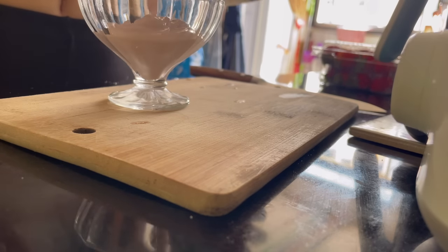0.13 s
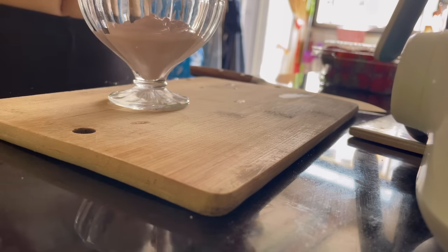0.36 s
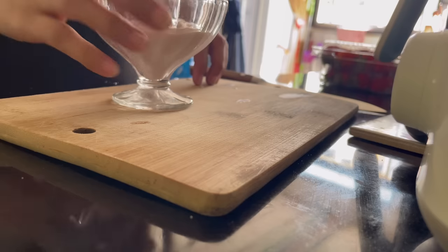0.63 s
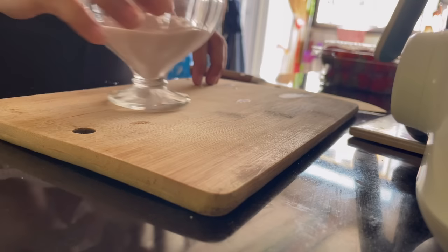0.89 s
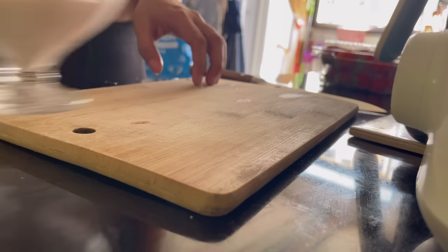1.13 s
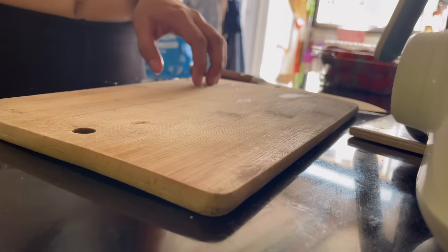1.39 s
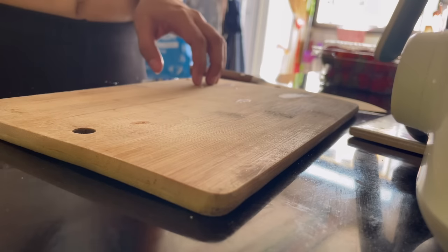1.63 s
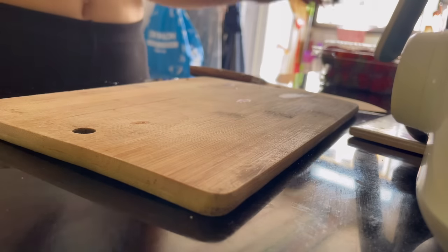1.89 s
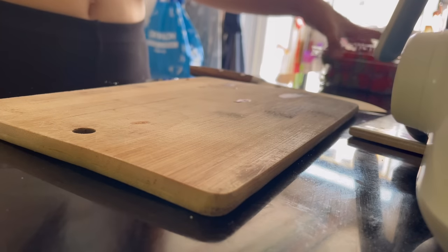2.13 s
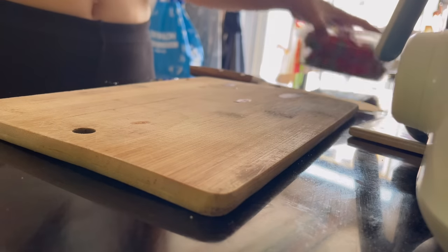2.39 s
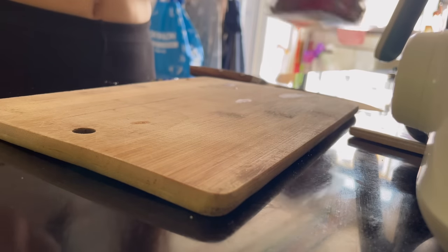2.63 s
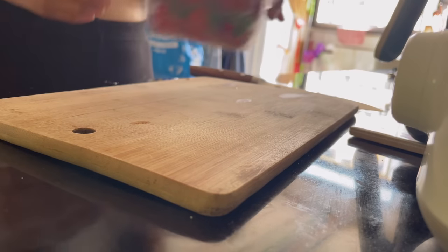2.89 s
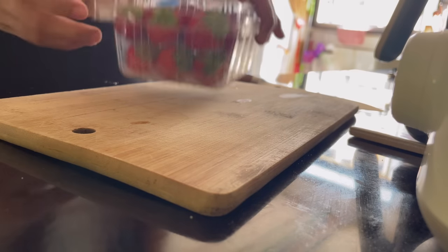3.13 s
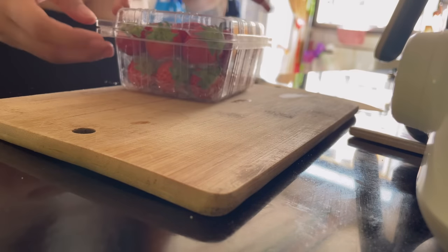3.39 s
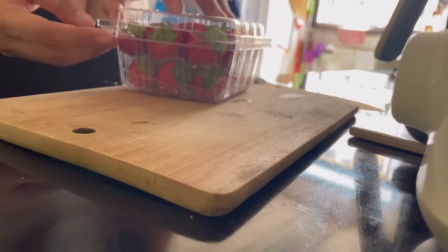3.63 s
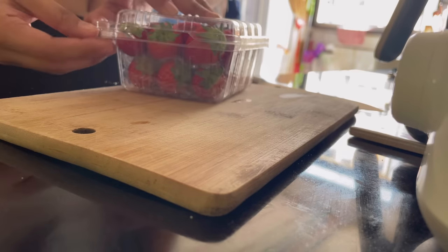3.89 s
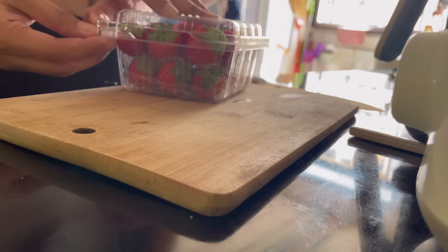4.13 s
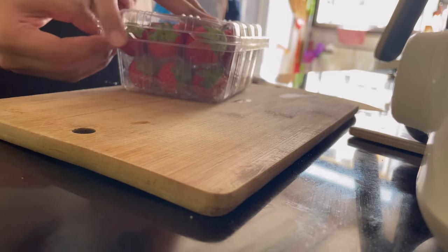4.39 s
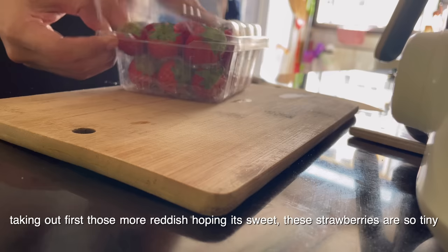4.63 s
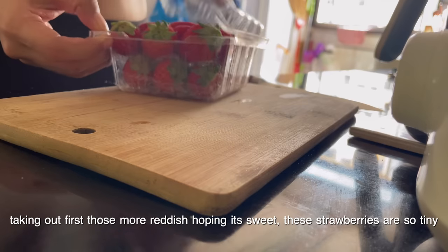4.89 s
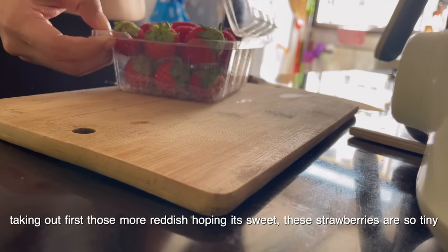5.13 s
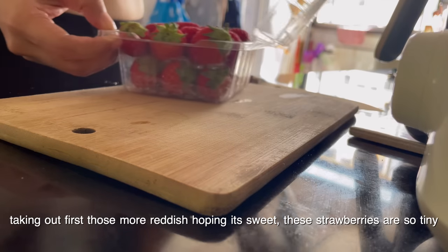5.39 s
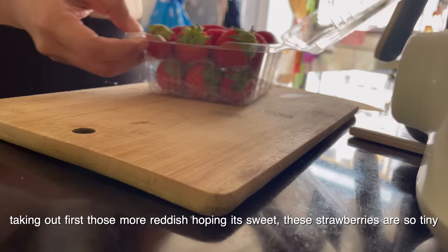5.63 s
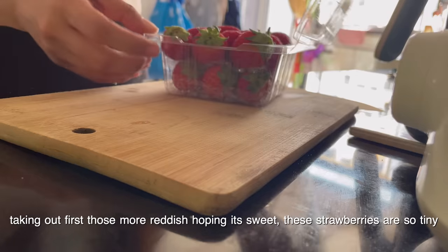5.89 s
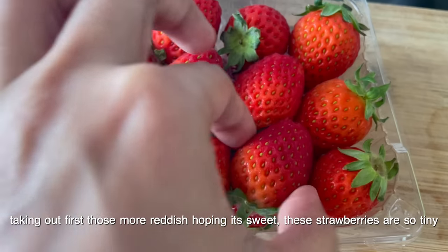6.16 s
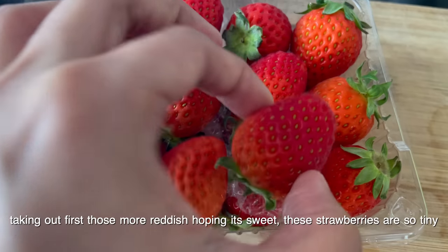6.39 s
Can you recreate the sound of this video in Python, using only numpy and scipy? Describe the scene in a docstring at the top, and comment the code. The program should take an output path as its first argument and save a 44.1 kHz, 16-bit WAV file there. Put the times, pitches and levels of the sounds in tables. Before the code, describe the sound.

A low, soft kitchen hum runs throughout, with very faint high whines and a thin whistle fading after 0.8 s. Tiny distant birds chirp between about 0.9 and 1.7 s. At 1.4 s a glass bowl hits the table: a loud, hard clunk with a short woody ring and bright glass edge, chattering quickly until 1.5 s, with barely audible touches after. A faint soft tone comes at 1.75 s. Light plastic ticks crackle at 2.1-2.25 s, then clicks at 2.8-3.3 s as a thin fruit box lands on wood. Small creaks continue to 4.2 s. A firm click at 4.3 s leads to very loud snaps at 4.6 and 4.83 s and another at 5.2 s. The box slides with a quiet hiss around 5.3-5.8 s, with small clicks and soft low bumps. From 6.0 s one plastic click, then fingertips tick and brush faintly; a last chirp near 6.5 s. Close, with short room echo.

```python
"""A kitchen: a glass bowl is set down on a table and rocks, ringing the table top and itself in decaying tones.
A thin plastic fruit box is picked up, put on a wooden board, snapped open and slid along: clicks are short
noise bursts through the box's resonances, rustle, brushing and sliding are shaped noise. Soft bumps and one
short soft tone are decaying tones, far birds falling tones, the low hum and a fading whistle filtered noise,
faint whines wavering tones. A phone with two openings lies close by; the kitchen adds a fading noise tail."""
import sys
import numpy as np
from scipy import signal
from scipy.fft import rfft, irfft
from scipy.io import wavfile
from scipy.ndimage import uniform_filter1d

SR = 44100
rng = np.random.default_rng(int(sys.argv[2]) if len(sys.argv) > 2 else 0)


def ratio(d):
    """dB to gain"""
    e = np.asarray(d, float) / 20
    return 10 ** e


def master(y):
    """Save y as 16-bit WAV."""
    cut = np.clip(np.atleast_2d(y).T, -1, 1)
    pcm = np.round(cut * 32767)  # scale
    wavfile.write(sys.argv[1], SR, pcm.astype(np.int16))


N = 287526
T = np.arange(N) / SR  # time in seconds

# Touches of the glass foot on the table. Each row: start in seconds, level in dB,
# low thud in dB relative to that level, glass ring in dB relative to that level.
BOWL_KNOCKS = [(1.397, -3, -13.5, -14), (1.445, -16.5, -6, -12.5), (1.457, -16.5, -11, -20),
               (1.466, -17, -19, -15.5), (1.483, -24, -1.5, -25), (1.547, -37.5, -1, -14.5),
               (1.588, -33.5, -11, -41), (1.714, -41.5, -8, -17)]
# Ringing tones of the table top. Each row: pitch in Hz, strength in dB, time to fall 60 dB in seconds.
TABLE_MODES = [(62, -26, 0.13), (99.2, 2, 0.38), (162, -1.5, 0.43), (201, 10.5, 0.18), (268, 4, 0.16),
               (413, -1.5, 0.1), (585, 2, 0.11), (704, 3, 0.038), (970, 8.5, 0.029), (1074, 7, 0.02),
               (1300, 6, 0.029), (1720, -33, 0.017), (2000, -31.5, .02), (2600, -4, 0.026),
               (3000, -17, 0.054)]
# Ringing tones of the glass. Each row: pitch in Hz, strength in dB, time to fall 60 dB in seconds.
GLASS_MODES = [(4900, -5.5, 0.006), (6880, -5, 0.04), (7420, 4.5, 0.013), (8740, -4, 0.0063),
               (9050, -15.5, 0.009), (11700, -7, 0.0045)]
# A plastic wall buckling or tapping. Each row: start in seconds, level in dB, pitch in Hz,
# thud in dB relative to that level, crack in dB relative to that level.
WALL_CLICKS = [(2.085, -35.5, 2300, -37, -12), (2.114, -45.5, 1420, -25, -11),
               (2.206, -37.5, 2370, -11, -15), (2.217, -33, 2860, -30, -23), (2.226, -32, 1390, -23, -11),
               (2.246, -40, 3300, 6, 0), (2.814, -38, 1180, -3, 4), (2.885, -34.5, 1130, -25.5, -13.5),
               (2.936, -29, 1130, -8, -2.5), (2.997, -31.5, 1300, -5, -8), (3.006, -27.5, 1180, -7.5, -7),
               (3.153, -20, 940, -3.5, -10.5), (3.181, -22.5, 970, -2, -8.5), (3.229, -38, 1000, -3, -8),
               (3.27, -34.5, 1120, -2, -9), (3.507, -39, 4470, -13.5, -28), (3.55, -27.5, 1280, -5.5, -5),
               (3.643, -38, 1600, 1, -1.5), (3.682, -38, 970, -2, -0.5), (4.143, -39.5, 1000, 1, -10),
               (4.331, -17, 1010, -4.5, -8), (4.497, -35.5, 990, -6.5, -23), (4.612, -2.5, 1470, -29, -13),
               (4.785, -29.5, 1230, -10.5, -26), (4.833, -3, 1100, -7.5, -2), (4.99, -33.5, 1060, -17, 8.5),
               (5.201, -9, 1390, -47, -22), (5.579, -31.5, 2760, -14, -20), (5.655, -36, 4050, -21, -9),
               (5.667, -32, 4070, -25.5, 12.5), (5.692, -23.5, 2000, -25, 6.5), (5.703, -19, 1760, -30, 5),
               (5.749, -35.5, 940, 4.5, -21), (6.063, -26, 1300, -30, -6.5)]
# Short plastic noises that swell more slowly than a click. Each row: start in seconds,
# level in dB, pitch in Hz, crack in dB relative to that level, time scale in milliseconds.
SLOW_SWELLS = [(3.442, -35, 960, -11.5, 12.3), (3.719, -46, 1750, -5, 8), (3.819, -40.5, 1200, -1.5, 9.6),
               (3.906, -50, 1330, -4, 7.8), (4.172, -36, 960, -12.5, 10.7), (4.324, -33, 1210, -16, 5.9),
               (4.6, -17.5, 1900, -24, 9.3), (4.821, -22, 2400, -13.5, 7.7)]
# Thin bright ticks while fingers pick among the fruit. Each row: start in seconds, level in dB, pitch in Hz.
FINGER_TICKS = [(6.037, -44.5, 3500), (6.052, -40.5, 2520), (6.159, -38.5, 4900), (6.188, -44, 2000),
                (6.213, -37.5, 1320), (6.228, -41, 3000), (6.235, -37, 1450), (6.266, -44, 1300)]
# Ringing tones of the plastic box. Each row: pitch in Hz, strength in dB, time to fall 60 dB in seconds.
BOX_MODES = [(191, -12, 0.099), (312, 0, 0.036), (396.3, -1, 0.042), (720, -12, 0.049), (1000, 1.5, 0.078),
             (1300, 11, 0.0061), (1626, 1, 0.028), (1840, -19.5, 0.026), (2350, -15, 0.012),
             (3000, -4, 0.01), (3000, 7, 0.0013), (3660, 13.5, 0.0022), (4606, 6.5, 0.0051),
             (5270, 3.5, 0.0036)]
# Fingers working on the plastic. Each row: start in seconds, length in seconds, level in dB.
FINGER_GRIPS = [(2.07, 0.055, -59), (2.178, 0.15, -58.5), (2.395, 0.51, -71), (3.354, 0.036, -62),
                (3.419, 0.041, -59.5), (3.492, 0.0595, -57.5), (3.661, 0.045, -54.5), (3.71, 0.083, -61.5),
                (3.793, 0.038, -57), (4.107, 0.19, -66.5), (4.943, 0.1, -48), (6.015, 0.052, -62.5),
                (6.16, .15, -61), (6.344, .2, -68)]
# Tone colour of the rustle. Each row: frequency in Hz, relative strength in dB.
RUSTLE_COLOUR = [(400, -20), (800, -1), (1200, 2.5), (2000, -1), (3500, -3), (6000, -3.5), (9000, -10.5),
                 (12000, -21), (15500, -21.5)]
# Fingertips brushing leaves and plastic. Each row: start in seconds, length in seconds, level in dB.
FINGER_BRUSHES = [(6.017, .105, -56.5), (6.138, 0.19, -57)]
# Tone colour of the brushing. Each row: frequency in Hz, relative strength in dB.
BRUSH_COLOUR = [(1500, -20), (3000, -2), (6000, -2.5), (9000, 0), (12000, -0.5), (15500, 3)]
# Tone colour of plastic sliding on wood. Each row: frequency in Hz, relative strength in dB.
SLIDE_COLOUR = [(350, -67), (600, -13), (703, -9), (1070, -9.5), (4330, -4.5), (6100, -13), (7240, -10),
                (8260, -9), (10800, -15.5), (14000, -23)]
# Soft bumps and one short soft tone near 400 Hz. Each row: start in seconds, level in dB before the
# fade shape, pitch in Hz, decay time constant in seconds.
SOFT_TONES = [(1.759, -37.5, 402.4, 0.039), (5.594, -21.5, 62, 0.014), (5.758, -30, 81, 0.019)]
# Far birds. Each row: start in seconds, length in seconds, first pitch in Hz, last pitch in Hz, level in dB.
BIRD_CHIRPS = [(0.862, .07, 3450, 3330, -62), (.95, .05, 3700, 3620, -73), (1.077, .08, 4900, 4520, -77),
               (1.176, 0.092, 3495, 2900, -62), (1.25, 0.046, 3900, 3650, -68),
               (1.685, 0.069, 3420, 3090, -62), (6.474, 0.064, 5780, 5470, -58.5)]
# Level of the hum as heard; it dips briefly around the loud lid snaps.
# Each row: time in seconds, level in dB.
HUM_LEVEL = [(0.0, -45.5), (1.2, -44), (4.43, -44), (4.75, -49), (4.87, -53.5), (5.03, -45), (5.8, -44),
             (6.52, -48.5)]
# Tone colour of the hum. Each row: frequency in Hz, relative strength in dB.
HUM_COLOUR = [(12, -42), (20, -45), (43, -4), (107, -1.5), (145, -11.5), (301, -15), (344, -24.5),
              (416, -13.5), (464, -18), (1660, -33.5), (1800, -41.5), (2930, -38), (3840, -44.5),
              (6090, -50.5), (13000, -60)]
# Thin steady whines. Each row: pitch in Hz, rms level in dB.
WHINE_TONES = [(2896, -81.5), (2955, -80), (3015, -87), (3311, -80), (5356, -88), (6051, -83)]
# How long the kitchen rings. Each row: frequency in Hz, time to fall 60 dB in seconds.
ROOM_DECAY = [(100, 0.11), (300, 0.4), (1000, 0.38), (4000, 0.38), (10000, 0.31)]
# Noise shared by the two openings. Each row: frequency in Hz, common share of the power from 0 to 1.
PORT_SHARE = [(60, 0.92), (170, 0.96), (300, 0.59), (900, 0.065), (3000, 0.74), (5000, 0.55), (6000, 0.87),
              (7500, 0.94), (12000, 0.44)]
# Timing between the openings. Each row: frequency in Hz, lead of left over right in radians.
PORT_LEAD = [(0, 0), (170, 0), (430, 1), (600, 2.4), (1000, 3.2), (1400, 4.5), (1750, 6.3), (3400, 7.7),
             (4300, 6.5), (5500, 6.3), (6900, 3.2), (8000, 2.6), (10700, 0), (12200, -.7), (13800, -3.1)]
# Loudness between the openings. Each row: frequency in Hz, left minus right in dB.
PORT_LEVEL = [(60, -1), (260, -6), (450, -2), (700, 9.5), (1100, 0.5), (1750, -2.5), (2200, 2), (4000, 3),
              (6200, 3.5), (7200, 0)]


def at(table, hz):
    """Read a table of frequency and value on a log-frequency axis."""
    f, value = np.transpose(table)
    return np.interp(np.log(np.maximum(hz, 1)), np.log(np.maximum(f, 1)), value)


def shape(x, gain):
    """Filter by a gain given as a function of frequency."""
    n = x.shape[-1]
    return irfft(rfft(x) * gain(np.arange(n // 2 + 1) * SR / n), n)


def resonance(x, hz, sharpness):
    """Keep mostly what lies around one pitch; a higher sharpness keeps a narrower band."""
    return shape(x, lambda f: 1 / (1 + (sharpness * (f / hz - hz / (f + 1))) ** 2))


def colour(x, tone, low_hz, high_hz):
    """Give x a tone colour, with rms 1 between the two frequencies."""
    y = shape(x, lambda f: ratio(at(tone, f)))
    return y / shape(y, lambda f: (f > low_hz) & (f < high_hz)).std()


def unit_peak(y):
    """Scale to a peak of 1."""
    return y / np.abs(y).max()


def pair(n):
    """Noise at the two openings: much alike in the bass, least alike near 900 Hz."""
    common, left, right = rng.standard_normal((3, n))
    share = lambda f: np.clip(at(PORT_SHARE, f), 0, 1)
    own = shape(np.array([left, right]), lambda f: np.sqrt(1 - share(f)))
    return shape(common, lambda f: np.sqrt(share(f))) + own


def ring(modes, scatter_db):
    """Decaying tones of a struck body; each blow varies their strengths and slightly their pitches."""
    hz, db, t60 = np.transpose(modes)[:, :, None]
    strength_luck, pitch_luck = rng.standard_normal((2, len(modes), 1))
    t = np.arange(8192) / SR
    tones = np.sin(2 * np.pi * hz * (1 + 0.019 * pitch_luck) * t)
    fade = 1000. ** (-t / t60)
    return unit_peak((ratio(db + scatter_db * strength_luck) * tones * fade).sum(0))


def struck(push, modes, scatter_db):
    """A body's tones driven by a push, scaled to peak 1."""
    return unit_peak(signal.fftconvolve(push, ring(modes, scatter_db)[None], axes=1))


def add(out, s, y):
    """Mix a short sound in at time s, faded out towards its end."""
    i, n = int(s * SR), y.shape[-1]
    fade = np.clip(np.linspace(4, -1, n), 0, 1)
    out[:, i:i + n] += (y * fade)[..., :N - i]


def swell(start, attack, stop, release, db):
    """Gain that rises smoothly and, from the stop time, falls 30 dB per release time."""
    rise = np.sin(np.pi / 2 * np.clip((T - start) / attack, 0, 1)) ** 2
    return ratio(db) * rise * 1000. ** (-np.clip(T - stop, 0, None) / (2 * release))


def uneven_specks(per_s, spread_db, decay_s):
    """Random tiny impulses of very uneven size, each dying away exponentially; overall spread 1."""
    size = ratio(spread_db * rng.exponential(size=N).clip(0, 3.))
    specks = (rng.random(N) < per_s / SR) * size
    smear = signal.lfilter([1], [1, -np.exp(-1 / (decay_s * SR))], specks)
    return smear / smear.std()


def glass_bowl():
    """Each touch of the foot chatters briefly, clatters broadly and rings the table top and the glass."""
    out, t = np.zeros((2, N)), np.arange(2048) / SR
    low = [m for m in TABLE_MODES if m[0] < 350]
    high = [m for m in TABLE_MODES if m[0] >= 350]
    soft = (t * np.exp(-t / 0.00069))[None]  # the table top yields over a few milliseconds
    clatter_band = lambda f: 1 / (1 + (f / 2520.0) ** 8) / (1 + (140.0 / (f + 1)) ** 4)
    for s, db, thud_db, glass_db in BOWL_KNOCKS:
        # one sharp blow, then a short chatter
        push = (t == 0) + 0.38 * pair(len(t)) * np.exp(-t / 0.00427)
        clatter = shape(pair(len(t)) * np.exp(-t / 0.0077), clatter_band)
        add(out, s, ratio(db) * 0.43 * unit_peak(clatter))
        knock = struck(push, high, 0.64)
        thud = ratio(thud_db) * struck(soft, low, 2.9)
        glass = ratio(glass_db) * struck(push, GLASS_MODES, 2.2)
        add(out, s, ratio(db) * (knock + thud + glass))
    return out


def plastic_clicks():
    """Each click, swell or tick is a short noisy run, heard bare, through the box's tones and as a crack."""
    out, t = np.zeros((2, N)), np.arange(4096) / SR
    low = [m for m in BOX_MODES if m[0] < 600]
    mid = [m for m in BOX_MODES if m[0] > 600]
    click_rise, swell_rise = 0.14, .7  # rise time constants as shares of the time scale
    # each event: start, level, pitch, thud dB, crack dB, time scale in ms, rise
    # a click's time scale is five cycles of its pitch
    events = [(s, db, hz, thud_db, crack_db, 5000 / hz, click_rise)
              for s, db, hz, thud_db, crack_db in WALL_CLICKS]
    events += [(s, db, hz, -9.5, crack_db, ms, swell_rise) for s, db, hz, crack_db, ms in SLOW_SWELLS]
    events += [(s, db, hz, -22, 4.5, 2.3, click_rise) for s, db, hz in FINGER_TICKS]
    for s, db, hz, thud_db, crack_db, ms, rise in events:
        uneven = ratio(10. * uniform_filter1d(rng.standard_normal(len(t)), size=16))
        age = 1000 * t / np.clip(ms, .2, 14)  # time counted in time scales
        fade = np.exp(-(age / 2.2) ** 2) + 0.099 * np.exp(-age / 2.6)
        run = pair(len(t)) * uneven * (1 - np.exp(-age / rise)) * fade
        panel = resonance(run * np.exp(-age / 12.4), hz, 1.4)
        bright_hz = 7000 * np.exp(.2 * rng.standard_normal())  # every event has its own brightness
        crack = resonance(run * np.exp(-.4 * age), bright_hz, 1.7)
        add(out, s, ratio(db) * (0.97 * unit_peak(panel) + ratio(crack_db) * unit_peak(crack)))
        box = 0.52 * struck(run, mid, 2.9)
        thud = ratio(thud_db) * struck(run, low, 0.92)
        add(out, s, ratio(db) * (box + thud))
    return out


def handling():
    """How hard the plastic is worked: grips plus a shiver after every wall click, summed as powers."""
    attack_s, release_s = 0.025, 0.11
    shiver_db, shiver_t60_s = -35.5, 0.49  # level relative to the click, time to fall 60 dB
    grips = sum(swell(s, attack_s, s + length, release_s, db) ** 2 for s, length, db in FINGER_GRIPS)
    shivers = sum(swell(s, 0.0034, s, shiver_t60_s / 2, db + shiver_db) ** 2 for s, db, *_ in WALL_CLICKS)
    return np.sqrt(grips + shivers)


def rustle():
    """Dense tiny creases of very uneven size, each dying over some milliseconds, make the walls ring along."""
    grain = pair(N) * (uneven_specks(500, 3.4, 0.0055) + 0.85)
    walls = ring([m for m in BOX_MODES if m[0] > 600], 0.52)
    creak = signal.fftconvolve(grain, walls[None], axes=1)[:, :N]
    bare = colour(grain, RUSTLE_COLOUR, 2400, 12000)
    return handling() * (bare + ratio(1.0) * creak / creak.std())


def brushing():
    """Fingertips make dense bright pricks of uneven size over a thin hiss."""
    grain = pair(N) * (uneven_specks(450, 4., 0.0012) + 0.53)
    gain = sum(swell(s, .006, s + length, .03, db) for s, length, db in FINGER_BRUSHES)
    return gain * colour(grain, BRUSH_COLOUR, 4000, 12300)


def slide():
    """Smooth plastic on wood grain: an even hiss that flickers a little."""
    flicker_db = uniform_filter1d(rng.standard_normal(N), size=300) * np.sqrt(300)
    hiss = colour(pair(N) * ratio(flicker_db), SLIDE_COLOUR, 2400, 11700)
    return swell(start=5.26, attack=0.22, stop=5.73, release=0.12, db=-48.5) * hiss


def soft_tones():
    """Soft bumps and one short soft tone near 400 Hz, each a single decaying tone."""
    out, t = np.zeros((2, N)), np.arange(8000) / SR
    for s, db, hz, decay in SOFT_TONES:
        fade = (1 - np.exp(-4. * t / decay)) * np.exp(-t / decay)
        add(out, s, ratio(db) * np.sin(2 * np.pi * hz * t) * fade)
    return out


def birds():
    """Short falling whistles, made slightly rough by a wobbling pitch."""
    out = np.zeros((2, N))
    for s, length, first_hz, last_hz, db in BIRD_CHIRPS:
        n = int(length * SR)
        wobble = 0.16 * uniform_filter1d(rng.standard_normal(n), size=200)
        hz = np.linspace(first_hz, last_hz, n) * (1 + wobble)
        add(out, s, ratio(db) * np.hanning(n) * np.sin(2 * np.pi * np.cumsum(hz) / SR))
    return out


def whistle():
    """A rough whistle, noise in one narrow resonance, that fades from 0.8 s on."""
    centre_hz, width_hz = 2940, 56
    y = shape(pair(N), lambda f: 1 / (1 + ((f - centre_hz) / width_hz) ** 2))
    return swell(start=-1, attack=1, stop=.8, release=.6, db=-75) * y / y.std()


def hum():
    """Rumble and hiss from all around, as coloured noise, with thin tones whose phase wavers."""
    waver = uniform_filter1d(rng.standard_normal((len(WHINE_TONES), N)), size=2000).cumsum(1)
    whines = 0
    for (hz, db), wander in zip(WHINE_TONES, waver):
        whines = whines + ratio(db) * np.sqrt(2) * np.sin(2 * np.pi * hz * T + 0.011 * wander)
    s, level_db = np.transpose(HUM_LEVEL)
    return ratio(np.interp(T, s, level_db)) * colour(pair(N), HUM_COLOUR, 37, 760) + whines


def room(x):
    """Echoes as a noise tail that builds up over a few milliseconds and dies band by band."""
    t = np.arange(SR // 2) / SR
    noise = pair(len(t))
    tail = 0
    for hz in 62.5 * 2. ** np.arange(9):  # octave bands
        band = shape(noise, lambda f: (f >= hz / np.sqrt(2)) & (f < hz * np.sqrt(2)))
        tail = tail + band * 1000. ** (-t / at(ROOM_DECAY, hz))
    tail = tail * (1 - np.exp(-t / 0.0063))
    tail = tail / np.sqrt((tail ** 2).sum(1).mean())
    room_db = -12.5
    return ratio(room_db) * signal.fftconvolve(x[:1], tail, axes=1)[:, :N]


def scene():
    """Bowl, box, fingers and birds also sound through the kitchen; the other layers come without it."""
    echoing = glass_bowl() + plastic_clicks() + rustle() + brushing() + slide() + birds()
    return echoing + room(echoing) + soft_tones() + hum() + whistle()


def roll_off(x):
    """The treble ends steeply here."""
    return signal.sosfilt(signal.butter(12, 16470, fs=SR, output="sos"), x)


def record(dry):
    """The two openings differ in phase and colour; loud peaks are rounded and the band's extremes weakened."""
    f, lead = np.transpose(PORT_LEAD)
    side = np.array([[.5], [-.5]])  # half of each difference to the left, half to the right
    balance = lambda hz: ratio(side * at(PORT_LEVEL, hz))
    turn = lambda hz: np.exp(1j * side * np.interp(hz, f, lead))
    ports = shape(dry, lambda hz: balance(hz) * turn(hz))
    ceiling = 1.3
    rounded = ceiling * np.tanh(ports / ceiling)
    low_hz, high_hz = 40, 10900
    band = lambda hz: 1 / np.sqrt((1 + (low_hz / (hz + 1)) ** 4) * (1 + (hz / high_hz) ** 12))
    mix = shape(rounded, band)
    return roll_off(mix)


dry = scene()
out = record(dry)
master(out)
```